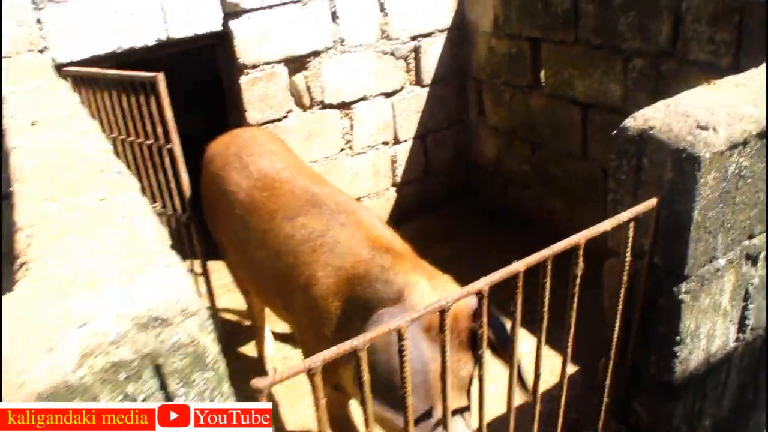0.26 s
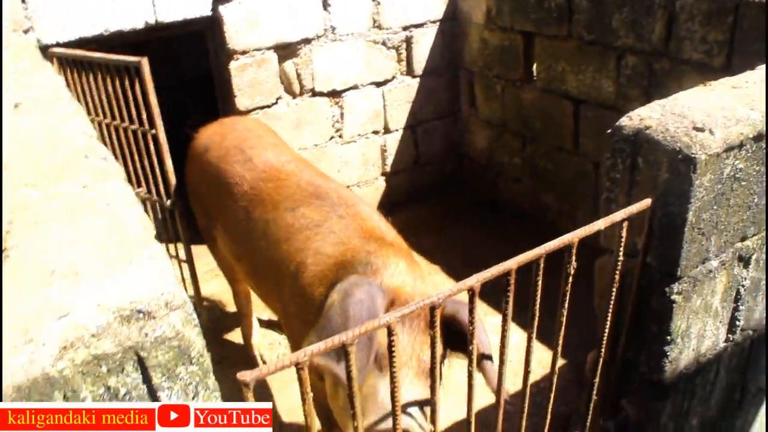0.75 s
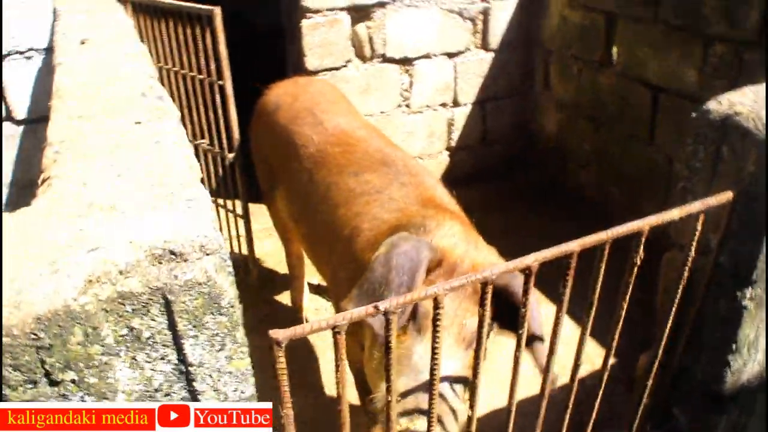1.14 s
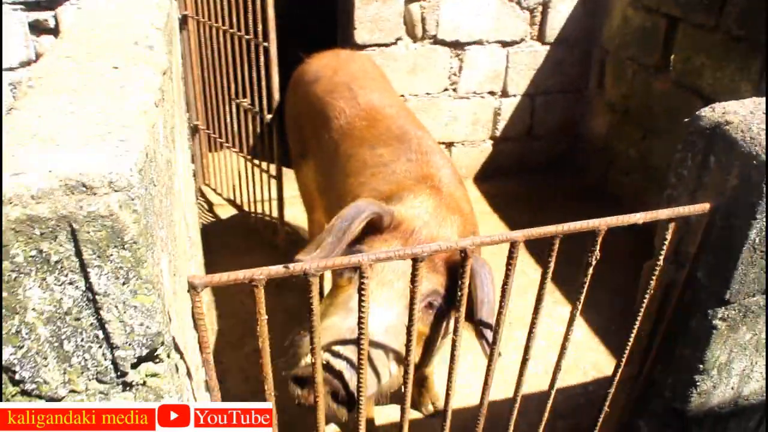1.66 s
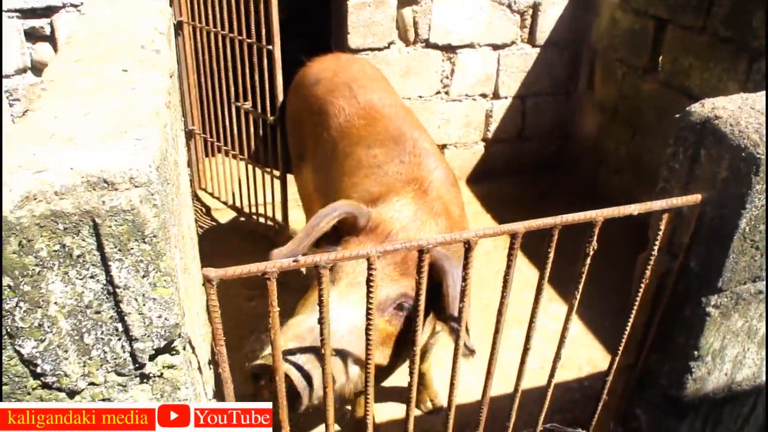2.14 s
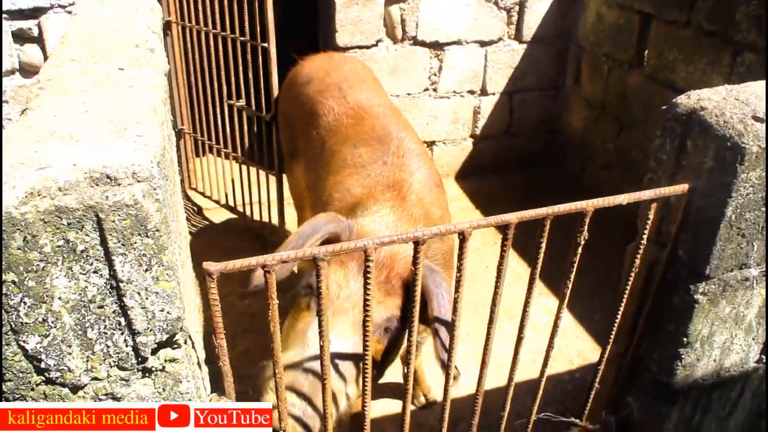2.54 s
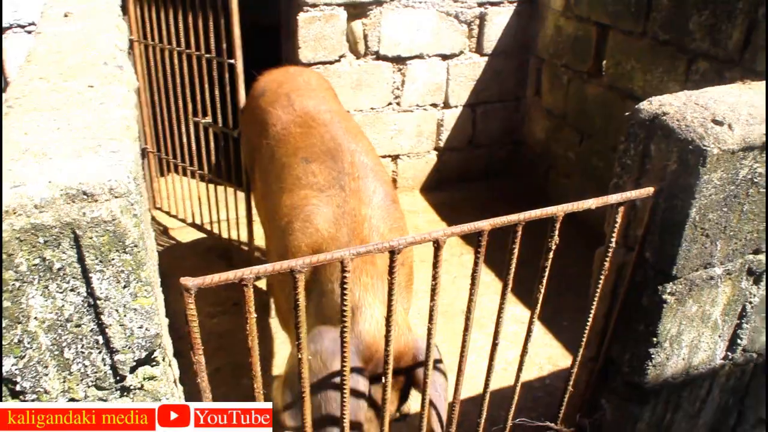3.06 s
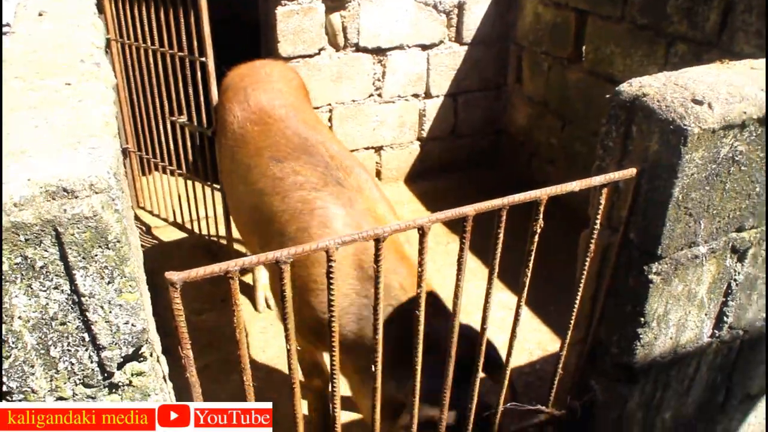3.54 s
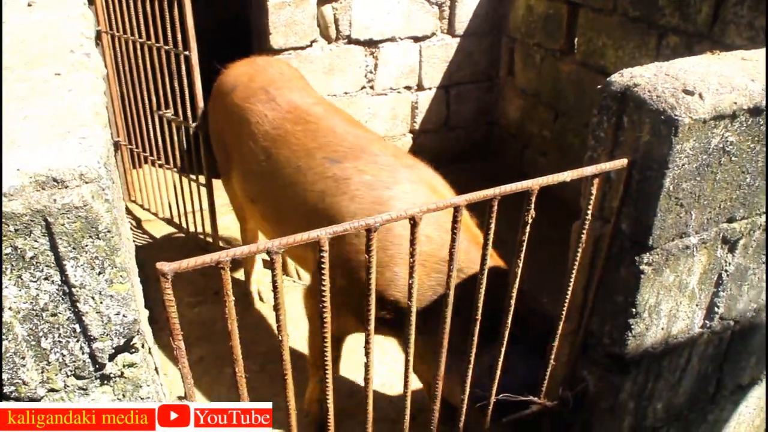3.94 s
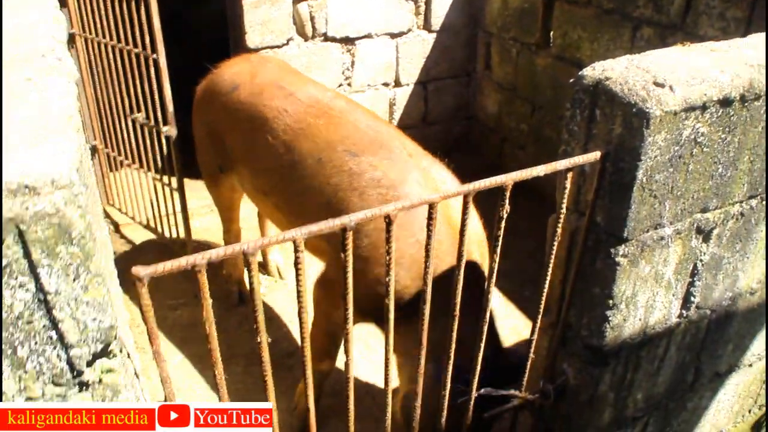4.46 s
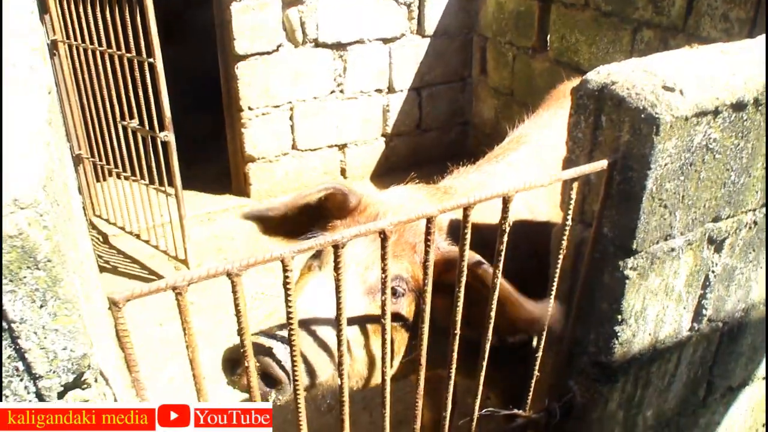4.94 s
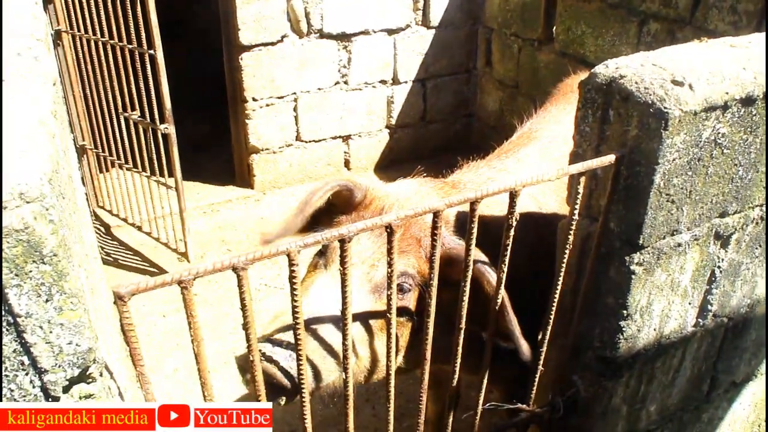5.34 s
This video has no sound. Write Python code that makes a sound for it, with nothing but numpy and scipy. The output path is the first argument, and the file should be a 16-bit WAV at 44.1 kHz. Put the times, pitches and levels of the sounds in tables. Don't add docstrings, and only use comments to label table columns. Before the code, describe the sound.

Close camera microphone: a short pulsing pig grunt, soft nose breaths, a sharp knock, then three more grunts, the third loudest and duller, the last brighter and softer. Stone walls add a very short echo. Distant insects hold a wavering whine above a steady low wash; a background dip marks the cut, then low wind thumps, rubbing and ticks finish.

```python
import sys
import numpy as np
from scipy import signal
from scipy.fft import rfft, irfft
from scipy.io import wavfile
from scipy.ndimage import uniform_filter1d

SR = 44100
rng = np.random.default_rng(int(sys.argv[2]) if len(sys.argv) > 2 else 0)


def ratio_of_db(decibels):
    return 10 ** (np.asarray(decibels, float) / 20)


def generate_wav(signal):
    frames = np.transpose(np.atleast_2d(signal))
    scaled = np.clip(frames, -1, 1) * 32767
    pcm = np.round(scaled).astype(np.int16)
    wavfile.write(sys.argv[1], SR, pcm)


N = 247401

# t/s, first gap/s, settled gap/s, excess gap left per pulse/0-1, rasp/0-1
THROAT_PULSES = [
    (.2618, .0298, .0192, .47, .10),
    (2.0436, .0236, .0195, .5, .07),
    (2.6524, .0340, .0232, .3, .08),
    (3.7180, .0278, .0195, .1, .13),
]
# t/s, level/dB, brightness/(dB per octave)
EFFORT = [
    [(.26, -8, 1), (.292, -3, 0), (.337, -9.5, -0.5), (.357, -6, 0), (.40, -16.5, -6)],
    [(2.043, 0, 3), (2.067, -2, 0), (2.088, -2, 1), (2.128, -11, 1), (2.17, -26, -1)],
    [(2.652, -11, -6), (2.686, -4, -5), (2.712, 0.5, -2), (2.76, -4, -4.5), (2.80, -23, -6)],
    [(3.718, -13.5, 0.5), (3.746, -6, 2.5), (3.786, -7.5, 2.5), (3.806, -10, 3.5), (3.85, -30, 2)],
]
# f/Hz, width/Hz, level/dB
TRACTS = [
    [(123, 17, -10.5), (318, 126, 4.5), (747, 70, -4.5), (1031, 38, 0.5), (1377, 147, 10.5),
     (1880, 150, -0.5), (2300, 99, -1.5), (2720, 120, -14), (3200, 200, -11), (3550, 150, 1.5)],
    [(107.5, 9.5, -19), (302, 67, -6), (702, 72, -12.5), (970, 90, -3.5), (1270, 130, -0.5),
     (1890, 170, -12), (2300, 510, -12), (2850, 250, -9), (3290, 210, -1.5), (4660, 360, -4)],
    [(273, 99, -6.5), (370, 30, -10), (691, 36, -11), (1087, 82, -2), (1443, 72, -1.5), (1780, 150, 1),
     (2230, 200, -11), (2780, 280, -18), (3505, 100, -12), (4100, 380, -19)],
    [(151, 32, 2.5), (387, 140, -24), (666, 41, -9.5), (1133, 47, -3.5), (1470, 81, -10.5), (1730, 260, 2),
     (2170, 270, -4), (2790, 180, -7.5), (3670, 200, -7), (4450, 340, -10)],
]
# resonance factor at start, factor at end, chest boom level/dB
SNOUT_SHAPES = [
    (1.087, 0.902, -32),
    (0.998, 1.065, -31),
    (0.96, 1.052, -13),
    (0.954, 1.11, -26),
]
# f/Hz, level/dB
SPIT_COLOUR = [(1800, -18), (2600, 4), (3600, 2), (4100, -6.5), (4800, -19)]
# t of the top/s, level/dB, rise/s, hold/s, fall/s
SNORTS = [
    (.415, -47.5, 0.075, 0.018, 0.047),
    (.532, -50, 0.032, .006, .02),
    (1.0, -54.5, 0.25, 0.39, .15),
    (1.655, -52.5, .012, 0.039, .08),
    (1.746, -54, .012, .006, .08),
    (2.165, -50, 0.039, 0.045, 0.014),
    (2.795, -52.5, .02, 0.027, 0.032),
    (3.828, -47, .025, 0.0087, .04),
    (4.33, -59, .04, .03, .05),
]
# f/Hz, level/dB
NOSTRIL_COLOUR = [(1500, -22), (3500, 15.5), (7000, 7.5), (10000, 1), (13500, 3.5), (14800, -2),
                  (15800, -25)]
# t/s, peak level/dB, f/Hz, upper modes level/dB
KNOCKS = [
    (1.4053, -10, 2330, -18),
    (1.686, -16, 1800, -7),
    (3.6764, -13, 1670, -0.5),
]
# t/s, peak level/dB, low knock relative level/dB, knock f/Hz
TICKS = [(4.8355, -35, 5, 2010), (4.8815, -24, 6.5, 2300), (5.1675, -19.5, 2, 1780), (5.212, -23, 14, 2060),
         (5.222, -21, 1, 2370), (5.253, -11.5, -5, 2180), (5.2583, -12, 7, 2300), (5.263, -28, -6, 2360),
         (5.2696, -21, 9, 2000), (5.5376, -19.5, 3, 2610), (5.577, -19.5, 5, 2220)]
# f/Hz, level/dB
SHELL_COLOUR = [(4500, 0), (7000, 4.5), (9500, 1), (11500, -4), (14000, 1.5), (15800, -15)]
# t of the top/s, level/dB, rise/s, hold/s, fall/s
RUBS = [
    (5.172, -45, .008, .03, .02),
    (5.222, -29.5, 0.052, 0.04, .02),
    (5.258, -32.5, 0.0092, .01, 0.14),
]
# t of the top/s, level/dB, rise/s, hold/s, fall/s
WIND_BUMPS = [
    (4.8, -38, .08, .01, .08),
    (4.92, -25, 0.021, .02, .06),
    (4.965, -30, .015, 0.017, 0.043),
    (5.065, -35, .03, .01, .05),
    (5.19, -28, .03, 0.012, 0.047),
    (5.485, -30, 0.022, 0.035, .04),
    (5.565, -37, .02, 0.017, .03),
]
# t/s, change/dB
SURGES = [(.07, 9.5), (.66, 3), (1.08, 9.5), (1.6, 3.5), (1.89, 3), (3.38, 3), (3.69, 6.5), (3.89, 3.5),
          (4.22, -8), (4.4, 3.5), (4.93, 4), (5.18, 7.5), (5.55, 4)]
# f/Hz, width/Hz, level/dB
UPPER_OVERTONES = [(9186, 83, -61.5), (12200, 120, -82)]
# f/Hz, level/dB
LONE_SINGERS = [
    (3656, -62),
    (5790, -73),
    (6714, -71),
]
# f/Hz, level/(dB per Hz)
WASH_COLOUR = [(15, -40), (30, -6), (60, -5), (150, -0.5), (313, 3.5), (600, 1.5), (1140, -2), (2000, -10),
               (3050, -15), (4200, -20.5), (6100, -27.5), (9300, -39), (14200, -40.5), (14700, -62)]
# t of the start/s, depth/dB, fall/s, recovery/s
BACKGROUND_DIPS = [
    (.3, 0.5, .1, 0.26),
    (2.04, 8.5, 0.085, 0.21),
    (2.68, 5, .09, 0.18),
    (3.74, 0.5, 0.16, 0.21),
    (4.672, 7, 0.0015, 0.11),
]


def evened(x):
    return x / np.sqrt(np.mean(abs(x) ** 2) + 1e-20)


def add(mix, s, sound):
    part = mix[round(s * SR):][:len(sound)]
    part += sound[:len(part)]


def coloured(x, points):
    f, db = np.transpose(points)
    hz = np.fft.rfftfreq(len(x), 1 / SR)
    curve_db = np.interp(np.log(hz + 1), np.log(f), db, -90, -90)
    return irfft(rfft(x) * ratio_of_db(curve_db), len(x))


def drift(hz):
    lowpass = signal.butter(2, hz, fs=SR, output="sos")
    slow = signal.sosfiltfilt(lowpass, rng.standard_normal(N + SR))
    return evened(slow[SR // 2:][:N])


def ring(hz, width, rise=.0001):
    t = np.arange(2600) / SR
    return (1 - np.exp(-t / rise)) * np.exp(-np.pi * width * t) * np.sin(2 * np.pi * hz * t)


def swells(rows):
    t = np.arange(N) / SR
    total = np.zeros(N)
    for s, db, rise, hold, fall in rows:
        away = np.maximum((s - t) / rise, (t - s - hold) / fall)
        total += ratio_of_db(db - 20 * away.clip(0, 9))
    return total


def tract_ring(at, mouth, effort, tract):
    s, _, tilt_db = np.transpose(effort)
    tilt = np.interp(at, s, tilt_db)
    uneven_db = 1.5 * rng.standard_normal(len(tract))
    body = np.zeros(2600)
    for k, (hz, width, db) in enumerate(tract):
        level = ratio_of_db(db + tilt * np.log2(hz / 700) + uneven_db[k])
        moved_hz = hz * mouth if hz < 2600 else hz
        rise = .0013 * (1 + (hz / 1500) ** 2)
        body += (-1) ** k * level * ring(moved_hz, width, rise)
    return body


def grunt(pulses, snout, effort, tract):
    start, first, settled, settling, rasp = pulses
    from_factor, to_factor, chest_db = snout
    s, level_db, _ = np.transpose(effort)
    gaps = settled + (first - settled) * settling ** np.arange(7)
    out, u = np.zeros(SR // 3), np.arange(1200) / SR
    for at in start + np.cumsum(gaps) - gaps:
        puff = rng.standard_normal(1201)
        drive = rasp * (1.5 * np.diff(puff) + .25 * puff[1:]) * np.exp(-u / .008)
        drive[0] = -1
        drive = np.convolve(drive, np.hanning(8))
        mouth = np.interp(at, s[[0, -1]], [from_factor, to_factor])
        slap = np.convolve(drive, tract_ring(at, mouth, effort, tract))
        add(slap, 0, -ratio_of_db(chest_db) * max(abs(slap)) * 3 * ring(140, 65, 0.014))
        spit_db, spit_s = -28, 0.0017
        spit = evened(coloured(puff[1:], SPIT_COLOUR)) * u / spit_s * np.exp(1 - u / spit_s)
        add(slap, .001, ratio_of_db(spit_db) * max(abs(slap)) * spit)
        if at < s[-1]:
            add(out, at - start, ratio_of_db(np.interp(at, s, level_db)) * slap / max(abs(slap)))
    return start - .0014, out


def pen(x, t60=0.15):
    t = np.arange(SR // 4) / SR
    sparse = (rng.random(len(t)) < .3) * rng.standard_normal(len(t))
    taps = sparse * ratio_of_db(-60 * t / t60) * (t > .003)
    return signal.fftconvolve(x, taps / np.linalg.norm(taps))[:N]


def pig():
    calls = np.zeros(N)
    for call in zip(THROAT_PULSES, SNOUT_SHAPES, EFFORT, TRACTS):
        add(calls, *grunt(*call))
    floor_echo = 0.092 * np.roll(calls, round(0.00357 * SR))
    return calls + floor_echo + ratio_of_db(-11) * pen(calls)


def snorts():
    hiss = evened(coloured(rng.standard_normal(N), NOSTRIL_COLOUR))
    flutter = ratio_of_db(1.45 * drift(120))
    return ratio_of_db(5.0) * swells(SNORTS) * hiss * flutter


def knocks():
    out = np.zeros(N)
    for s, peak_db, hz, bright_db in KNOCKS:
        low = ring(hz, 300, 0.00015) + .5 * ring(hz * 0.76, 400, 0.00032)
        upper = ring(hz * 1.47, 280, 0.0007) + ring(2790, 200, 0.00082)
        add(out, s, ratio_of_db(peak_db) * (low + ratio_of_db(bright_db) * upper))
    return out


def ticks():
    out, t = np.zeros(N), np.arange(1024) / SR
    shape = np.exp(-t / 0.0011) * (1 - np.exp(-t / 0.00049)) + 0.038 * np.exp(-t / 0.022)
    for s, peak_db, knock_db, hz in TICKS:
        crack = coloured(rng.standard_normal(1024), SHELL_COLOUR) * shape
        knock = (ring(hz, 185, 0.00062) + 1.2 * ring(3200, 460, 0.00034))[:1024]
        add(out, s, ratio_of_db(peak_db) * (crack / max(abs(crack)) + ratio_of_db(knock_db) * knock))
    return out


def rub():
    slips = (rng.random(N) < 900 / SR) * rng.standard_normal(N)
    body = .6 * ring(1400, 400) + ring(2200, 350) + .8 * ring(3300, 500)
    body += .25 * ring(7500, 2500) + .2 * ring(12000, 3000)
    return swells(RUBS) * evened(signal.oaconvolve(slips, body)[:N])


def wind():
    rumble_colour = [(20, -9), (45, -4.0), (80, -5), (130, -9.5), (220, -29)]  # f/Hz, level/dB
    return swells(WIND_BUMPS) * evened(coloured(rng.standard_normal(N), rumble_colour))


def insects():
    chorus_hz, surge_s = 3052, .06
    t = np.arange(N) / SR
    surge_db = sum(db * np.exp(-((t - s) / surge_s) ** 2) for s, db in SURGES)
    turn = np.exp(2j * np.pi * chorus_hz * t)
    tone = evened(.6 + drift(17) + 1j * drift(17)) * turn
    overtone = evened(.4 + drift(30) + 1j * drift(30)) * turn ** 2
    out = ratio_of_db(-34.5 + surge_db) * tone
    out += ratio_of_db(-45 + 0.14 * surge_db) * overtone
    for hz, width, db in UPPER_OVERTONES:
        fuzz = evened(drift(width / 2) + 1j * drift(width / 2))
        out += ratio_of_db(db) * fuzz * turn ** round(hz / chorus_hz)
    for hz, db in LONE_SINGERS:
        fuzz = evened(drift(13) + 1j * drift(32))
        out += ratio_of_db(db) * fuzz * np.exp(2j * np.pi * hz * t)
    return np.sqrt(2) * out.real


def wash():
    a, b, patches = rng.standard_normal((N // 256 + 5, 513, 3)).T
    patches = uniform_filter1d(uniform_filter1d(patches, 10, 0), 10, 1)
    spectra = (a + 1j * b) * ratio_of_db(evened(patches))
    noise = signal.istft(spectra, nperseg=1024, noverlap=768)[1][:N]
    return evened(coloured(noise, WASH_COLOUR)) * ratio_of_db(-28)


def dip_gain():
    t = np.arange(N) / SR
    dip_db = np.zeros(N)
    for s, db, fall, back in BACKGROUND_DIPS:
        recovery = np.exp(-((t - s - fall).clip(0) / back) ** 2.06)
        dip_db += db * ((t - s) / fall).clip(0, 1) * recovery
    return ratio_of_db(-dip_db)


def scene():
    near = pig() + snorts() + knocks() + ticks() + rub() + wind()
    background = dip_gain() * (insects() + wash())
    return (near + background)[None]


def band_limit(x):
    return signal.sosfilt(signal.butter(12, 16130, fs=SR, output="sos"), x)


def record(dry):
    thin = signal.sosfilt(signal.butter(2, 35, "high", fs=SR, output="sos"), dry)
    soft = thin / (1 + thin ** 8) ** .125
    top = signal.firwin(255, 15700, fs=SR)[None]
    mix = signal.oaconvolve(soft, top, "same")
    return band_limit(mix)


dry = scene()
out = record(dry)
generate_wav(out)
```